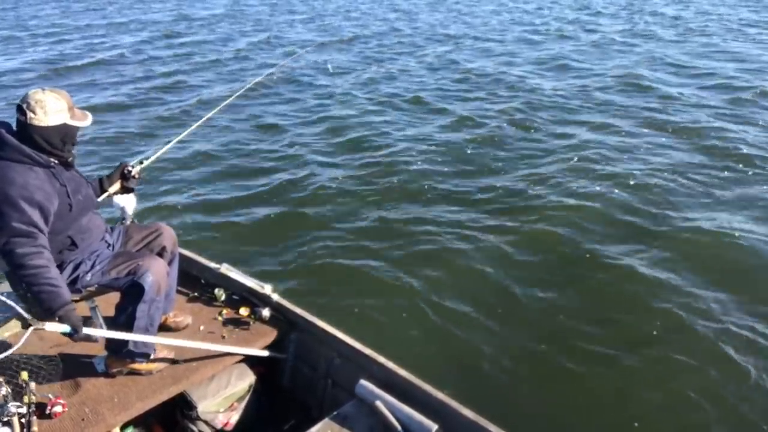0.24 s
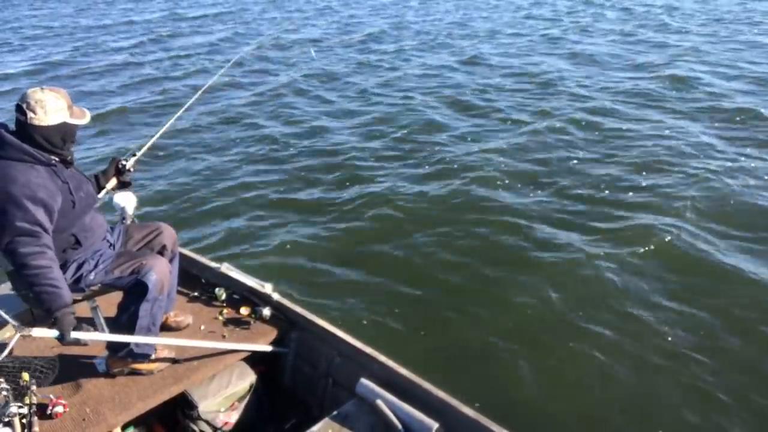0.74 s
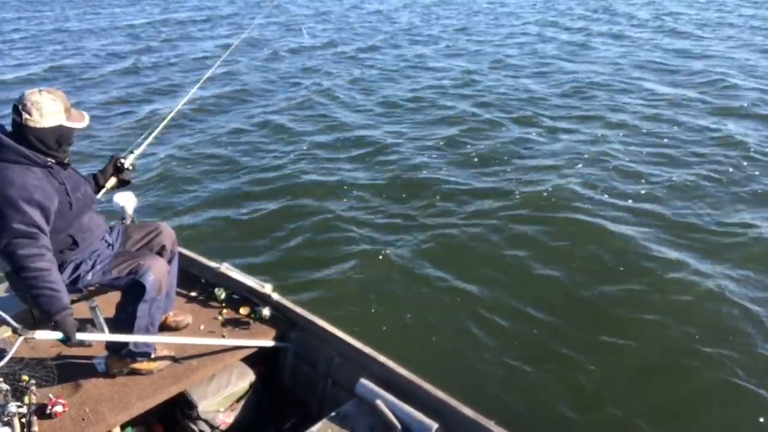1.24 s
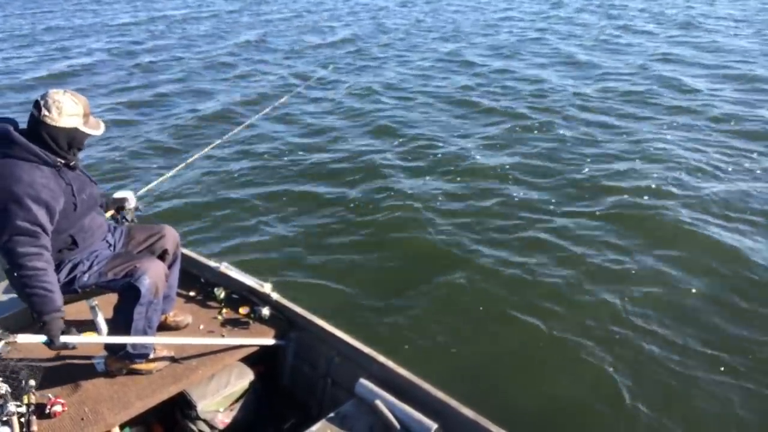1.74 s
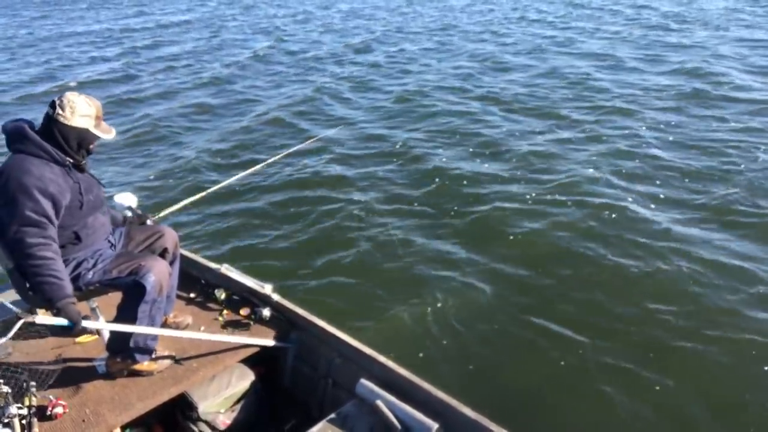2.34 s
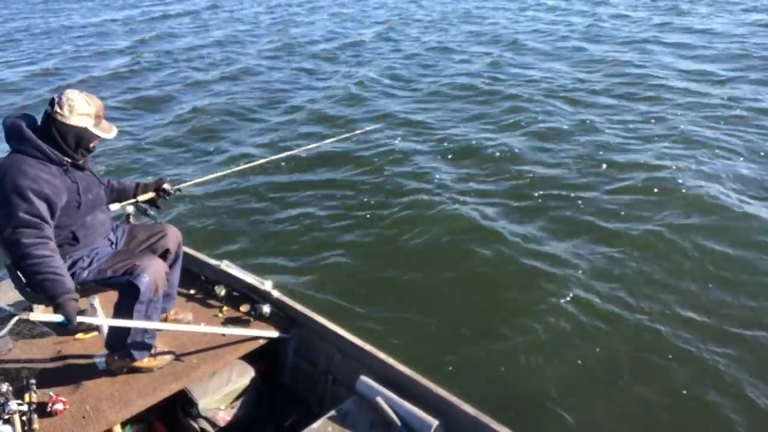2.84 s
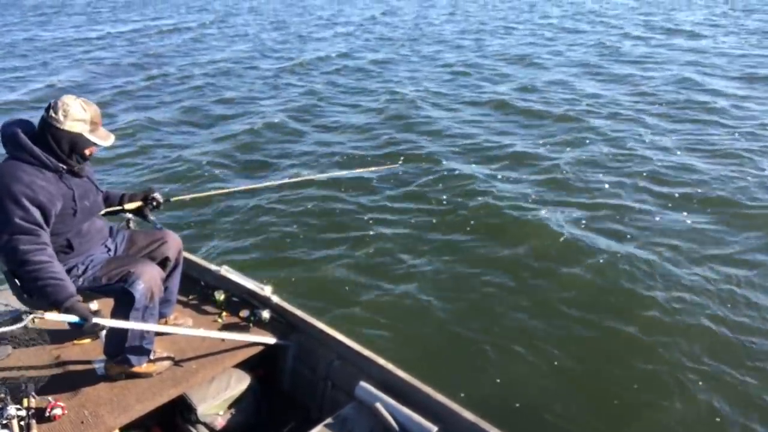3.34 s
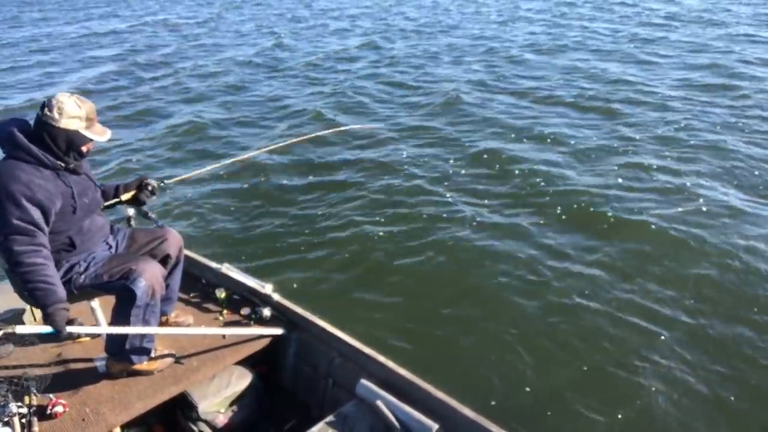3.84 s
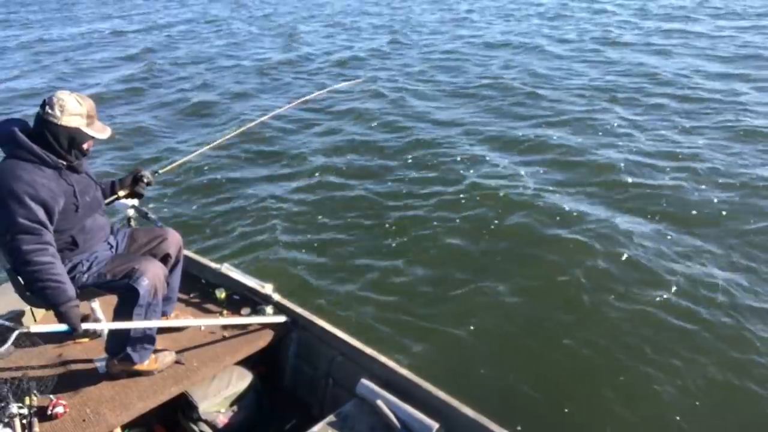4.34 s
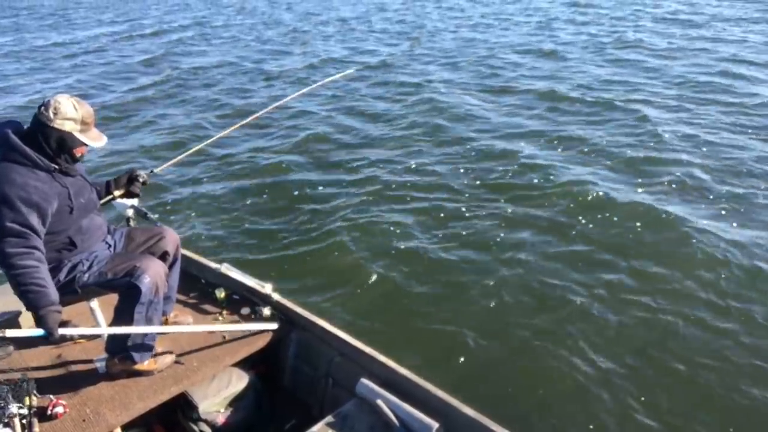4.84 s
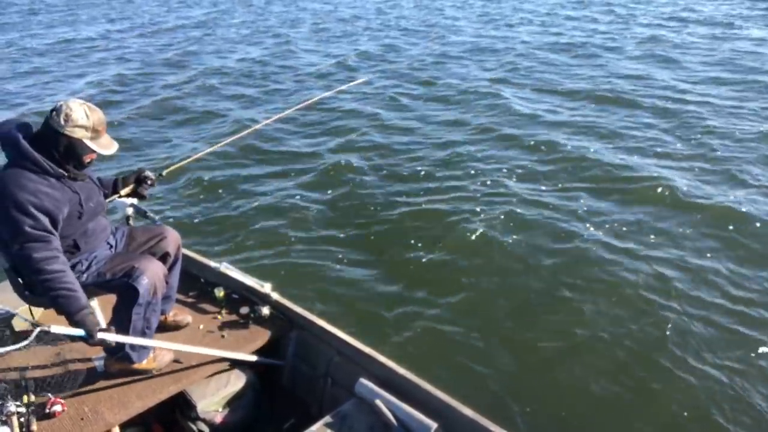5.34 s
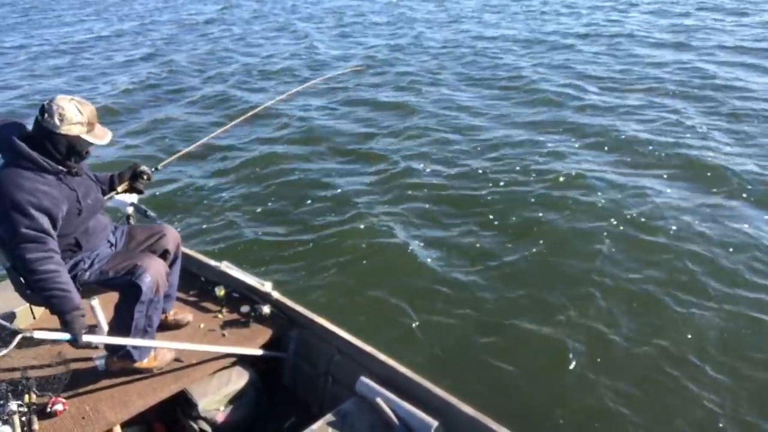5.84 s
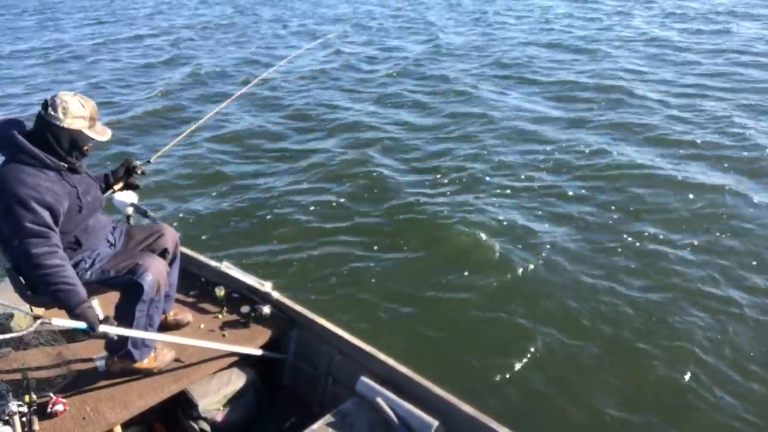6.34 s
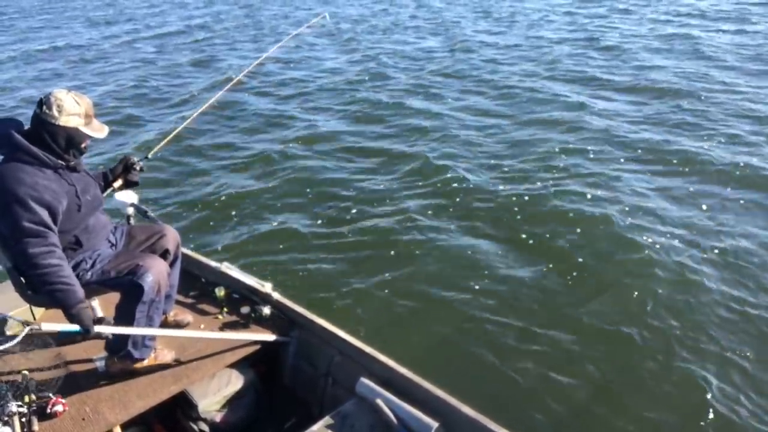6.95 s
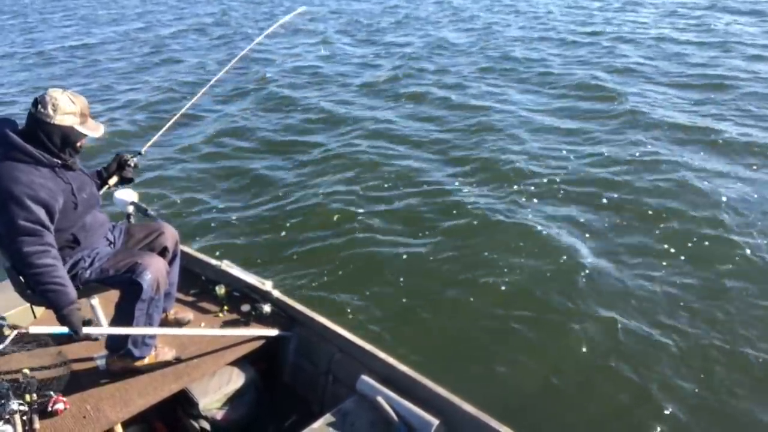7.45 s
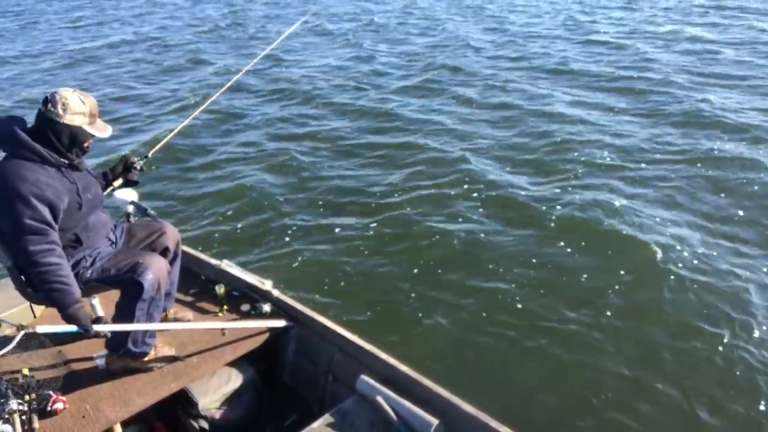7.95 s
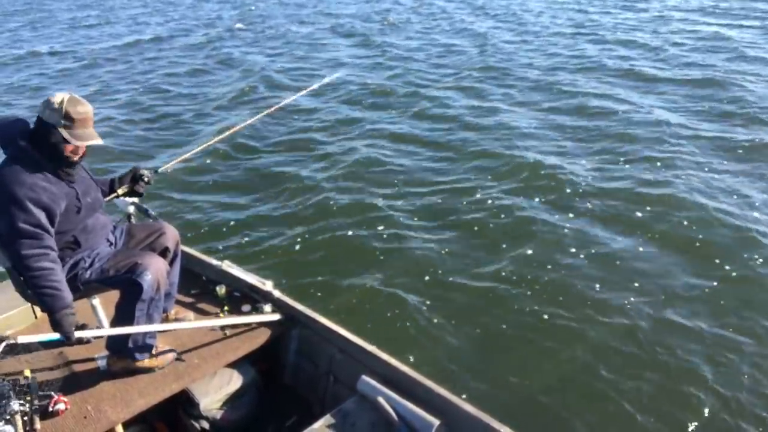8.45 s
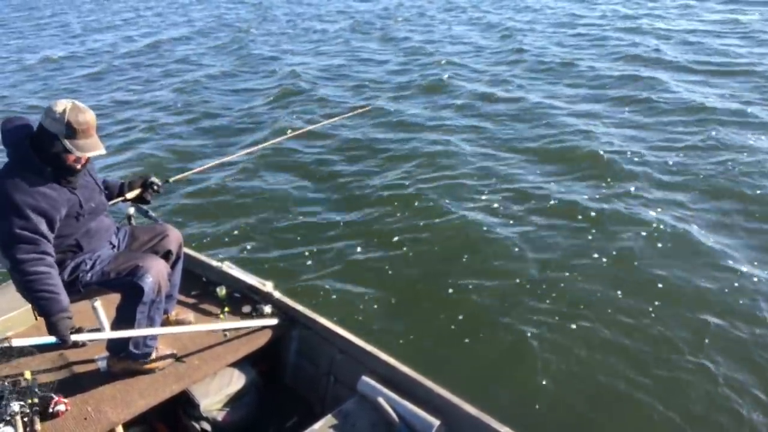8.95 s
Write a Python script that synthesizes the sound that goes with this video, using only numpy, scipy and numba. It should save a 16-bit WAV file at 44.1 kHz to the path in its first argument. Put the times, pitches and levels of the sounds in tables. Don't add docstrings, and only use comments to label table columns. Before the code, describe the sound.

Very close and loud on an open lake: hard metal raps on a thin boat hull, each a crack with a short tinny ring and hollow body, in a nearly regular rhythm. One pause midway is filled with clattering small gear; knocking resumes somewhat duller and softer, then brightens, and stops before the end, leaving rattles, ticks, quiet water laps, tiny drips and low wind on the microphone.

```python
import sys
import numpy as np
from scipy import signal
from scipy.fft import rfft, irfft
from scipy.io import wavfile
from scipy.ndimage import uniform_filter1d, minimum_filter1d
from numba import njit

SR = 44100
rng = np.random.default_rng(int(sys.argv[2]) if len(sys.argv) > 2 else 0)


def dump(signal):
    limited = np.clip(np.atleast_2d(signal).T, -1, 1)
    pcm = np.round(limited * 32767).astype(np.int16)
    wavfile.write(sys.argv[1], SR, pcm)


def gain_from_db(level_db):
    decades = np.asarray(level_db, float) / 20
    return 10 ** decades


N = 404838

# boom/dB, body/dB, hardness/dB
BLOWS = [(0.0685, -5.5, -17, 0, -3.5), (0.407, -4, -14, -6, -10), (0.7257, -3, -17.5, -5.5, -9.5),
         (1.0415, -5, -13, -4.5, -10), (1.389, -2.5, -13.5, -7.5, -10.5), (1.7617, -3.5, -11.5, -6.5, -7),
         (2.123, -2, -12, -4, -7), (2.446, -3, -12, -7, -4), (2.831, -5, -14.5, -5.5, -2.5),
         (3.1914, -2, -14.5, -6.5, -5.5), (3.5243, -5, -11.5, -6.5, -4), (3.8983, -5, -6, -12, -5.5),
         (5.1573, -4, -12, -1, -5), (5.5227, -8.5, -11, -1, -5), (5.8469, -6.5, -9.5, -2.5, -6),
         (6.186, -9, -12, -1, -4), (6.5214, -3.5, -16.5, -5.5, -10.5), (6.86, -5.5, -8.5, -4.5, -4),
         (7.199, -5.5, -12.5, -5.5, -6.5), (7.532, -7, -10, -3, -6.5), (7.8407, -4, -5.5, -14, -8),
         (8.138, -9, -30, -18.5, -2)]
# low f/Hz, high f/Hz
LEVEL_BANDS = [(120, 260), (260, 800), (900, 2200), (2500, 6000), (6500, 15000)]
# f/Hz, width/Hz, lift/dB
TOUCH_PEAKS = [(920, 410, 3.3), (2300, 1200, 1.8), (1230, 540, 9.3), (1550, 210, 5.4), (2540, 150, 2.9),
               (4600, 95, 2)]
# f/Hz, width/Hz, lift/dB
TACKLE_PEAKS = [(759, 95, 4.7), (1220, 110, 7.3), (3330, 36, 3.1), (4370, 220, 8.4), (5550, 160, 2.4),
                (7160, 510, 11)]
BLOW_DRIVE_DB = 4


def on_log(hz, table):
    table = np.array(table)
    return np.interp(np.log(hz), np.log(table[:, 0]), table[:, 1])


@njit
def ring(count, start, fade, swell, gain):
    out = np.zeros(count)
    for k in range(len(start)):
        a, b = gain[k], gain[k]
        steps = int(np.log(abs(a) * 1e5 + 1.) / -np.log(abs(fade[k])))
        for i in range(start[k], min(count, start[k] + steps)):
            out[i] += a.imag - b.imag
            a *= fade[k]
            b *= swell[k]
    return out


def modes(s, hz, t60, rise, gain):
    s, hz, t60, rise, gain = (v.ravel() for v in np.broadcast_arrays(s, hz, t60, rise, gain))
    fade = np.exp(2j * np.pi * hz / SR - np.log(1000) / (np.maximum(t60, .005) * SR))
    swell = fade * np.exp(-1 / (np.maximum(rise, 1e-4) * SR))
    start = np.ceil(s * SR)
    gain = gain * np.exp(2j * np.pi * hz * (start / SR - s))
    return ring(N, start.astype(np.int64), fade, swell, gain)


def dense(s, band_db, level_bands, peaks, t60, travel_s, rise_s, top_db, crack_db, crack_t60,
          lag_s=0., return_db=None, front_colour=None, focus=True):
    # f/Hz, level/dB
    firm_front = [(200, -30), (600, -24), (1200, -12), (2500, -8.5), (5000, -4), (10000, 1), (16000, 4)]
    spacing_hz, thinning = 10, .004
    index = np.arange(12, 520) + rng.random((len(s), 508))
    hz = spacing_hz / thinning * (np.exp(thinning * index) - 1)

    centre, width = np.sqrt(np.prod(level_bands, axis=1)), np.diff(level_bands)[:, 0]
    per_hz = band_db - 10 * np.log10(width)
    db = np.array([np.interp(np.log(f), np.log(centre), row) for f, row in zip(hz, per_hz)])
    db += 10 * np.log10(spacing_hz + thinning * hz)
    db += sum(lift / (1 + (2 * (hz - f) / w) ** 2) for f, w, lift in peaks)
    db += top_db * np.maximum(np.log2(hz / 11000), 0)
    db -= 12 * np.maximum(np.log2(0.69 * centre[0] / hz), 0)

    chance = rng.standard_normal(hz.shape + (4,))
    slow = np.sqrt(1000 / hz)
    arrive = s[:, None] + travel_s * (slow - .3)

    front = gain_from_db(db + crack_db + on_log(hz, front_colour or firm_front)) * np.exp(.35j * chance[..., 3])
    if focus:
        cycles = 1.25
        lead, swell = cycles / hz, cycles / hz / 2
        front = front * np.exp(-2j * np.pi * (travel_s * hz * slow + cycles))
    else:
        lead, swell = 0., .2 * rise_s * slow
    front_s = arrive + lag_s - lead
    crack = modes(front_s, hz, crack_t60 * slow, swell, front)
    if return_db:
        echo = front * gain_from_db(return_db + chance[:, :1, 0])
        crack += modes(front_s + 0.01, hz, crack_t60 * slow, swell, echo)

    gain = gain_from_db(db) * (chance[..., 0] + 1j * chance[..., 1]) / 2
    ring_t60 = t60(hz) * gain_from_db(chance[..., 2] / 2)
    return crack + modes(arrive, hz, ring_t60, lag_s + rise_s * slow ** 2, gain)


def walk(rate):
    k = int(SR / rate)
    held = np.repeat(rng.standard_normal(N // k + 1), k)
    return 1.3 * uniform_filter1d(uniform_filter1d(held, k), k)[:N]


def noise_bands(colour, centres, db_of, flicker_db, rate):
    hz, out = np.fft.rfftfreq(N, 1 / SR) + 1, 0
    spectrum = rfft(rng.standard_normal(N)) * gain_from_db(on_log(hz, colour))
    for c in centres:
        window = np.clip(1 - np.abs(2 * np.log2(hz / c)), 0, 1)
        out = out + irfft(spectrum * window, N) * gain_from_db(db_of(c) + flicker_db * walk(rate))
    return out / np.sqrt(np.mean(np.abs(spectrum) ** 2) / N)


def sheet_blows():
    # f/Hz, width/Hz, lift/dB
    sheet_peaks = [(676, 66, 1.5), (1254, 77, 8), (2580, 82, 5.5), (3020, 310, 4), (3840, 79, 4.5),
                   (4540, 230, 0.5), (5310, 37, 10), (6395, 70, 5), (9440, 130, -6.5)]
    # f/Hz, t60/s
    sheet_t60 = [(120, 0.33), (300, 0.42), (500, 0.21), (1000, 0.13), (2000, 0.094), (5000, 0.089),
                 (13000, 0.067)]
    s, heard_db, low, body, high = np.transpose(BLOWS)
    air = -8 - 0.064 * high
    db = heard_db + BLOW_DRIVE_DB
    band_db = db[:, None] + np.transpose([low - 7, body - 1, 0 * db - 6.5, high - 3, air - 3])
    return dense(s, band_db, LEVEL_BANDS, sheet_peaks, lambda hz: on_log(hz, sheet_t60),
                 travel_s=0.00313, rise_s=0.002, top_db=-24.5, crack_db=14.5, crack_t60=.015,
                 lag_s=0.00101, return_db=-9, focus=False)


def hull_modes():
    # f/Hz, level/dB, t60/s, rise/s
    hull_table = [(178.3, -18, .23, .006), (261.2, -10.5, .2, 0.015), (285.8, -7, 0.21, 0.036),
                  (358.5, -8, 0.22, 0.0012), (452, -3, .11, 0.00089), (546.2, -10.5, .17, 0.0033),
                  (522.5, -12, 0.13, 0.0051), (624, -5, 0.038, 0.00037), (735, -14, 0.14, .001),
                  (466.1, -4, 0.13, 0.0081), (890, -20, .12, .001), (933, -25, 0.2, .001)]
    landing_tilt = [0.077, 0.083, 0.14, 0.1, 0.093, 0.11, 0.091, 0.1, 0.14, 0.13, 0.091, 0.12, 2, 1.5, 2.5,
                    6.1, 0.091, 0.1, 0.13, 0.07, 0.1, 1.2]
    scatter_db, slip_rad = 1.5, 0.88
    s, heard_db, low, body, _ = np.transpose(BLOWS)
    db = heard_db + BLOW_DRIVE_DB
    hz, mode_db, t60, rise = np.transpose(hull_table)
    chance = rng.standard_normal((len(s), len(hz), 3))
    drive = np.where(hz < 220, (db + low + 11.0)[:, None], (db + body)[:, None])
    tilt = np.outer(landing_tilt, np.log2(hz / 450))
    gain = gain_from_db(drive + mode_db + tilt + scatter_db * chance[..., 0])
    gain = gain * np.exp(1j * slip_rad * chance[..., 1])
    gain *= (-1.) ** np.arange(len(hz))
    return modes(s[:, None] + 0.00297, hz * (1 + 0.0053 * chance[..., 2]), t60, rise, gain)


def pole_clack():
    # f/Hz, level/dB, t60/s
    pole_table = [(1258, -6, 0.041), (965, -17, 0.069), (1515, -11.5, .04), (2384, -7, 0.0079),
                  (4557, -18.5, 0.034)]
    clack_db = [-2.5, -3.5, -3, 3.5, 2.4, 1.3, 4, 1.4, 3, -0.4, 2.1, -8, -4, -4.5, 0, 3.5, -0.2, 2.4, -2.5,
                3.5, -7, -15]
    s, heard_db = np.transpose(BLOWS)[:2]
    hz, mode_db, t60 = np.transpose(pole_table)
    arrive = s[:, None] + .0006 + 0.001863 * np.sqrt(1000 / hz)
    gain = gain_from_db((heard_db + BLOW_DRIVE_DB + clack_db)[:, None] + mode_db) + 0j
    return modes(arrive, hz, t60, 0.00023, gain)


def singing_rail():
    rail_hz = [3436, 3447, 3462, 3484]
    partial_db = np.array([-15, 0, -9, -12])
    free_db = [1, 0, 0, -3, -5, 2, 5, 5, 3, 4, 0, -12, -4, -6, -8, -5, -7, 2, 6, -6, -3, -2]
    s = np.array(BLOWS)[:, :1]
    chance = rng.standard_normal((len(s), len(rail_hz), 2))
    db = np.array(free_db)[:, None] - 55 + partial_db + chance[..., 0]
    gain = gain_from_db(db) * np.exp(2j * chance[..., 1])
    return modes(s, np.array(rail_hz), .85, .02, gain)


def light_touch(s, db, body, mid, air):
    # f/Hz, t60/s
    touch_t60 = [(300, 0.081), (1500, 0.06), (5000, 0.026), (14000, .016)]
    # f/Hz, level/dB
    touch_front = [(200, -24), (600, -12.5), (1200, -8), (2500, 0), (5000, -9.5), (10000, -10.5),
                   (16000, -6)]
    s, db, body, mid, air = np.broadcast_arrays(s, db, body, mid, air)
    band_db = db[:, None] + np.transpose([body - 12, mid - 8.5, 0 * db - 6.5, air - 7])
    return dense(s, band_db, LEVEL_BANDS[1:], TOUCH_PEAKS, lambda hz: on_log(hz, touch_t60),
                 travel_s=.0024, rise_s=.0006, top_db=-18, crack_db=-1.5, crack_t60=.008,
                 front_colour=touch_front)


def bounces():
    # t/s, peak level at 4 kHz/dB, weight/dB, knock/dB
    touches = [(2.5883, -17.5, -38, 3), (2.601, -38.5, -24, -11), (2.617, -44.5, -18, 9),
               (5.278, -37, -15, 4.5), (3.88, -20.5, -17, -4), (2.829, -16, -6, 6.5),
               (2.936, -15, -23, -2.5), (3.184, -10, -2, -1), (3.2813, -10, -22, -4),
               (3.6126, -22.5, -36, 0.5), (4.096, -25.5, 5, -5), (4.4035, -26, 2, -3.5),
               (5.2617, -22.5, -27, 10.5), (6.8546, -6.5, -18, -1.5), (6.9606, -23.5, -26, 6.5),
               (7.194, -4.5, -18, -1.5), (7.3029, -11, -26, -4), (7.5197, -13, 8, 3.5),
               (7.6316, -15.5, -12, 1), (7.838, -21.5, -15, -13), (8.33, -27.5, 3.5, -3.5),
               (8.7535, -8.5, -16, -24.5), (8.7691, -29.5, -13, -5), (8.1372, -19, -20, -8),
               (8.686, -37.5, -15, -3.5), (4.2425, -21, -16, 3), (4.415, -29.5, -14, -2.5)]
    bright_db = [0.6, 0.6, 0.6, 0.6, 0.6, 0.6, 0.6, 0.55, 0.6, 0.6, 0.6, 0.6, 0.6, 2.3, 0.6, 0.6, 0.6, 2.5,
                 0.6, 0.6, 0.6, 0.6, 0.6, 3.5, 0.6, 0.6, 0.55]
    s, db, weight, knock = np.transpose(touches)
    return light_touch(s, db, weight, knock, -12 - 0.059 * knock + bright_db)


def scuffs():
    swing_db = [1, 2.5, -1.5, -2, -2, -1, 1.5, -3, -2.5, 2, 4.5, 1, -2, 3.5, 7, -2, 0.5, -1, -0.5, -1, 3, 2]
    s = np.array(BLOWS)[:, 0] - .021
    return light_touch(s, -49 + np.array(swing_db), 11, 1.5, -8)


def ticks():
    # t/s, peak level at 4 kHz/dB
    tick_table = [(0.1727, -44.5), (1.51, -57), (2.089, -40), (2.23, -39.5), (2.6565, -42), (2.785, -51),
                  (2.993, -48), (3.666, -46.5), (4.088, -39), (4.486, -48), (4.514, -45), (4.674, -48),
                  (0.3033, -44.5), (2.617, -42), (4.604, -45.5), (4.6483, -42.5), (4.712, -52),
                  (4.757, -47), (4.8315, -46), (4.945, -46.5), (5.683, -46.5), (6.14, -48), (6.662, -44.5),
                  (7.7792, -52.5), (8.03, -42.5), (8.084, -44), (8.434, -43.5), (8.5, -44.5), (8.88, -41.5),
                  (8.9384, -41.5), (8.991, -42.5), (9.0486, -41.5), (9.118, -40.5)]
    s, db = np.transpose(tick_table)
    return light_touch(s, db, 11, 1.5, -14)


def thuds():
    # t/s, peak level at 450 Hz/dB, hardness/dB
    bumps = [(0.302, -17.5, -34), (0.324, -19, -22.5), (0.604, -44, -34.5), (1.6605, -35, -31.5),
             (2.0683, -32, 0.5), (3.3712, -19.5, -20), (5.138, -19.5, -17.5), (5.82, -20, -18),
             (5.9551, -33, -7), (6.365, -13, -40), (6.6752, -31, -14), (7.135, -29, -14),
             (7.44, -26.5, -20), (1.502, -34.5, -13.5), (5.66, -27, -20), (8.659, -25, -12.5)]
    s, db, hard = np.transpose(bumps)
    band_db = db[:, None] + np.transpose([0 * db - 4.0, .5 * hard - 12.5, hard - 6, hard - 12.5])
    return dense(s - .004, band_db, LEVEL_BANDS[1:], TOUCH_PEAKS[0:3:2], lambda hz: .1 * (1000 / hz) ** .3,
                 travel_s=0.0013, rise_s=.008, top_db=-26, crack_db=-28, crack_t60=.01)


def rattles():
    # t/s, peak level at 4 kHz/dB, weight/dB
    shakes = [(2.1682, -19.5, 10), (3.872, -11, -23), (3.955, -26, 1.5), (3.983, -44, -1.5),
              (4.008, -29, -21), (4.0433, -29, -6), (4.1245, -35.5, -17.5), (4.1978, -13, -23),
              (4.2141, -9.5, -16.5), (4.239, -26, 1), (4.2527, -15.5, -4.5), (4.2554, -8.5, -0.5),
              (4.2894, -22, -6.5), (4.3187, -29, -15), (4.329, -29, -12.5), (4.348, -34.5, -6),
              (4.4495, -28, -11.5), (4.3689, -20.5, -27.5), (4.3879, -25.5, -5.5), (4.4165, -27.5, -26.5),
              (4.4273, -30, 6), (4.4421, -24.5, -32), (4.5551, -32.5, -33), (4.6313, -32, -27.5),
              (8.122, -13.5, -22), (8.174, -16.5, -5.5), (8.1761, -10.5, -6), (8.2031, -26.5, -0.5),
              (8.223, -33, -9), (8.241, -42.5, -5), (8.3146, -32, -12.5), (8.377, -37, -14.5),
              (8.258, -33.5, 0.5), (8.2884, -27, -3.5), (8.3394, -24, -16), (8.367, -27.5, -21.5),
              (8.445, -39.5, -5.5), (8.5432, -15, -16), (8.5591, -9, -11), (8.582, -23.5, -7),
              (8.5979, -28, -9), (8.608, -27.5, -5.5), (8.64, -35, -3), (8.6605, -41.5, -9),
              (8.703, -22.5, -18), (8.6867, -27, -10.5), (8.7056, -21, -19.5), (8.728, -31.5, -20.5),
              (8.8171, -28.5, -21.5)]
    small_db = [-4.5, -1.5, 4.5, 3, 6, -3.5, 1.5, -5, -2.5, 0.5, 6, 3, 4.5, 6.5, -0.5, 4, -3, 2, -1, -1, -6,
                7, -2.5, 1, -1.5, 5.5, -4, 1, 6.5, 0.5, -3.5, -2.5, 2.5, 0.5, 2.5, 4, 2, -5.5, 0.5, 0.5,
                0.5, -2.5, -1, -4, -0.5, 4.5, 5, 4.5, 6]
    s, db, body = np.transpose(shakes)
    mid = -6.5 + 0.46 * body
    air = -8 + 0.25 * body + small_db
    t60 = np.maximum(0.066 + .0005 * (db[:, None] + 28), .03)
    band_db = db[:, None] + np.transpose([body - 6, mid - 1.5, 0 * db - 4.0, air - 1.5])
    wash = dense(s, band_db, LEVEL_BANDS[1:], TACKLE_PEAKS, lambda hz: t60 * (4000 / hz) ** .2,
                 travel_s=.0012, rise_s=.001, top_db=-20, crack_db=-8, crack_t60=.007)
    return wash * gain_from_db(2.2 * walk(250.))


def slides():
    # t/s, length/s, start level at 4 kHz/dB, fall/dB, weight/dB
    slide_table = [(3.939, .13, -35, 11.5, -4.5), (4.228, .06, -23.5, 15, 15), (4.301, .165, -43, 5.5, 0),
                   (7.868, .06, -20, 26, 4), (8.143, .08, -27, 14.5, 16.5), (8.252, 0.14, -50, 10.5, 6),
                   (8.566, 0.076, -20.5, 20, 6.5), (8.685, 0.066, -36.5, 10.5, -14)]
    rows = []
    for (start, length, db, fall_db, weight), chance in zip(slide_table, rng.random((len(slide_table), 30))):
        part = chance[:int(160 * length)]
        rows += zip(start + length * part, db - fall_db * part, weight + 0 * part)
    s, db, mid = np.transpose(rows)
    db = db - 4 + 2.5 * rng.standard_normal(len(s))
    band_db = db[:, None] + np.transpose([mid - 6, mid - 5, 0 * db + 1.0, 0 * db - 9])
    return dense(s, band_db, LEVEL_BANDS[1:], TACKLE_PEAKS, lambda hz: 0.076 * (4000 / hz) ** 0.27,
                 travel_s=0.0015, rise_s=0.003, top_db=-17.5, crack_db=-11, crack_t60=0.0054)


def lid():
    # f/Hz, t60/s
    lid_modes = [(762, 0.11), (1215, 0.043)]
    # t/s, low mode level/dB, high mode level/dB
    lid_hits = [(4.096, -43, -26), (4.243, -22, -30), (4.402, -36, -27), (4.416, -42, -35),
                (4.428, -44, -28), (8.14, -16.5, -29), (8.175, -20, -36), (8.33, -44, -26),
                (8.755, -37, -22.5)]
    hits, (hz, t60) = np.array(lid_hits), np.transpose(lid_modes)
    return modes(hits[:, :1], hz, t60, 0.0014, gain_from_db(hits[:, 1:]) + 0j)


def drops():
    # t/s, f/Hz, level/dB
    drop_table = [(.6, 3700, -39), (1.665, 1550, -46), (5.98, 2380, -41), (6.02, 1525, -49),
                  (6.805, 1960, -44), (7.075, 2190, -47), (7.775, 2370, -40)]
    s, hz, db = np.transpose(drop_table)
    return modes(s, hz, 64 / hz, 0.0019, gain_from_db(db) + 0j)


def lake():
    # t/s, lapping level/dB, spray of droplets level/dB
    lapping = [(0.0, -53, -64.5), (0.84, -57, -72.5), (1.71, -55, -69), (1.99, -56, -64.5),
               (2.68, -49.5, -65.5), (2.9, -60, -62.5), (3.27, -55, -68), (3.6, -54.5, -63),
               (4.05, -55.5, -71), (4.24, -52.5, -59.5), (4.8, -56, -74), (5.27, -55.5, -68.5),
               (5.9, -54, -70.5), (6.62, -55, -69), (7.5, -56.5, -71.5), (7.87, -55.5, -63),
               (8.26, -54.5, -61.5), (9.18, -56.5, -67.5)]
    # f/Hz, level/dB per Hz
    lap_colour = [(88, 4), (150, 0.5), (674, -8), (910, -12), (1010, -13.5), (1870, -22.5), (3090, -25.5),
                  (3550, -25), (8580, -37.5), (16600, -50.5), (18000, -72.5)]
    s, lap_db, spray_db = np.transpose(lapping)
    t = np.arange(N) / SR
    slap = 0.5 * walk(99.0)
    patter = 1.7 * walk(150.)
    mid = np.interp(t, s, lap_db) + slap
    high = np.interp(t, s, spray_db + 14) + slap + patter

    def level(hz):
        return 8 + mid + (high - mid) * np.clip(np.log2(hz / 1500), 0, 1)

    wash = noise_bands(lap_colour, 160 * 2 ** np.arange(0, 7, .5), level, 1.8, 29.0)

    chance = rng.random((500, 4))
    when = chance[:, 0] * (N / SR - .1)
    hz = 400 * 2 ** (3.5 * chance[:, 1])
    size_db = np.interp(when, s, lap_db) - 2.5 - 4 * np.log(chance[:, 2] + .04) - 3 * np.log2(hz / 400)
    return wash + modes(when, hz, 40 / hz, .001, gain_from_db(size_db) + 0j)


def wind():
    # t/s, rumble level/dB
    gusts = [(0.0, -47.5), (0.919, -48), (1.53, -54), (1.92, -49), (3.12, -48.5), (3.27, -61), (3.53, -49),
             (4.14, -44.5), (4.4, -54), (4.699, -47.5), (5.851, -49.5), (6.03, -50), (6.77, -42.5),
             (7.01, -47), (7.39, -43.5), (7.67, -52), (8.54, -51), (9.18, -48.5)]
    # f/Hz, level/dB per Hz
    wind_colour = [(12, -38), (20, -26.5), (54, 2), (103, 0), (129, -3), (160, -14.5), (203, -16.5),
                   (242, -25.5), (400, -53), (520, -78), (880, -120)]
    db = np.interp(np.arange(N) / SR, *np.transpose(gusts)) + 3.5 * walk(11.)
    return noise_bands(wind_colour, 20 * 2 ** np.arange(0, 4.6, .5), lambda hz: db + 6.0, 0.72, 55.0)


def scene():
    knocking = sheet_blows() + hull_modes() + pole_clack() + singing_rail() + bounces() + scuffs()
    deck = ticks() + thuds() + rattles() + slides() + lid()
    return (knocking + deck + drops() + lake() + wind())[None]


@njit
def follow(x, fall):
    out, e = np.empty(len(x)), 1e-9
    for i in range(len(x)):
        e = max(x[i], e * fall)
        out[i] = e
    return out


def roll_off(x):
    return signal.sosfilt(signal.butter(12, 17250, fs=SR, output="sos"), x)


def record(dry):
    limit_db, ratio, release_s = -.6, 8., .012
    rumble_cut = signal.butter(2, 45.8, "high", fs=SR, output="sos")
    hiss_cut = signal.butter(2, 5200, "high", fs=SR, output="sos")
    hiss = gain_from_db(-78) * signal.sosfilt(hiss_cut, rng.standard_normal(N))
    heard = signal.sosfilt(rumble_cut, dry) + hiss
    peak = follow(np.abs(heard[0]) + 1e-9, np.exp(-1 / (release_s * SR)))
    gain = np.minimum(gain_from_db(limit_db) / peak, 1) ** (1 - 1 / ratio)
    gain = uniform_filter1d(minimum_filter1d(gain, size=41), size=21)
    return roll_off(np.clip(heard * gain, -1, 1))


dry = scene()
out = record(dry)
dump(out)
```